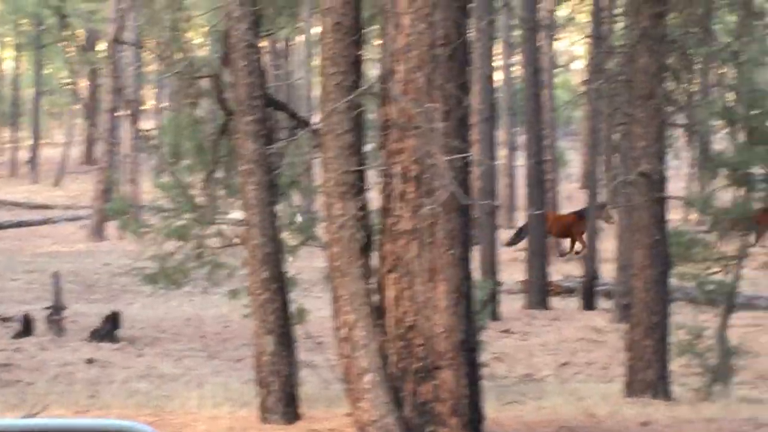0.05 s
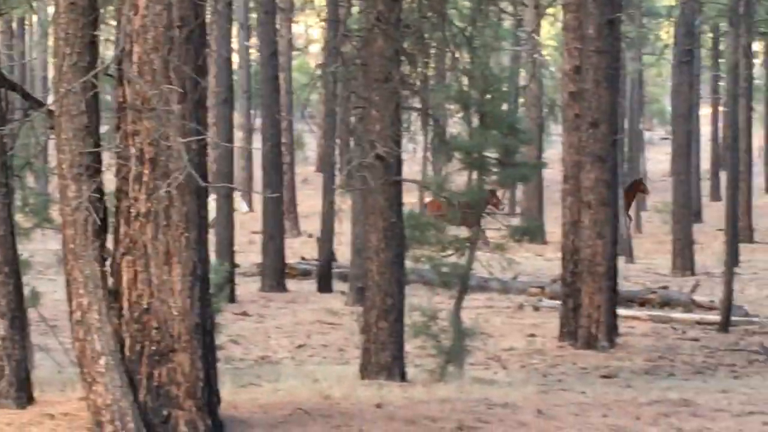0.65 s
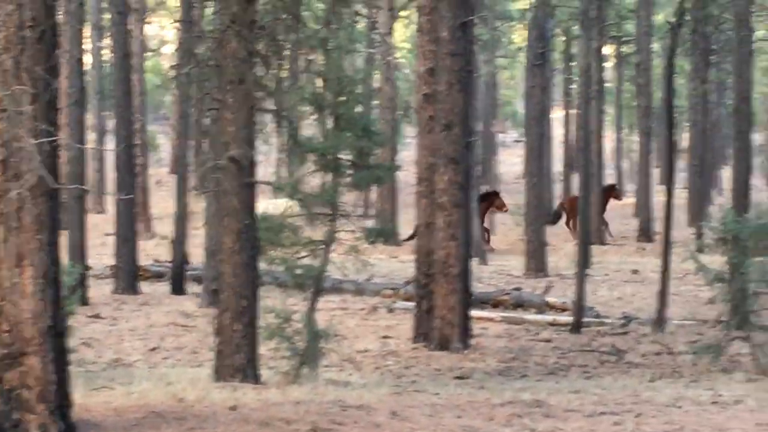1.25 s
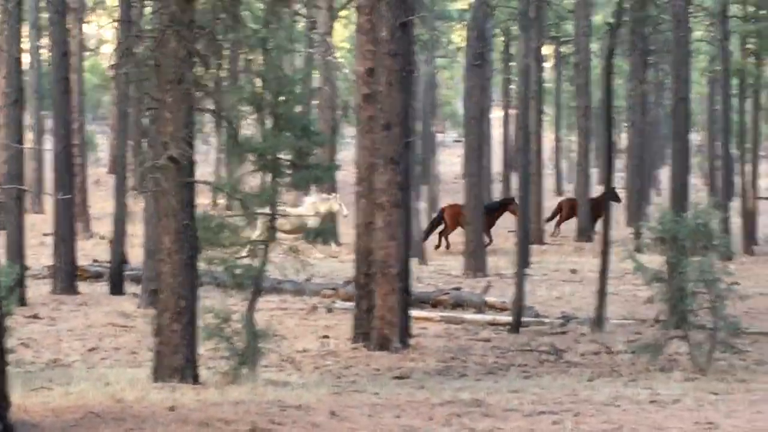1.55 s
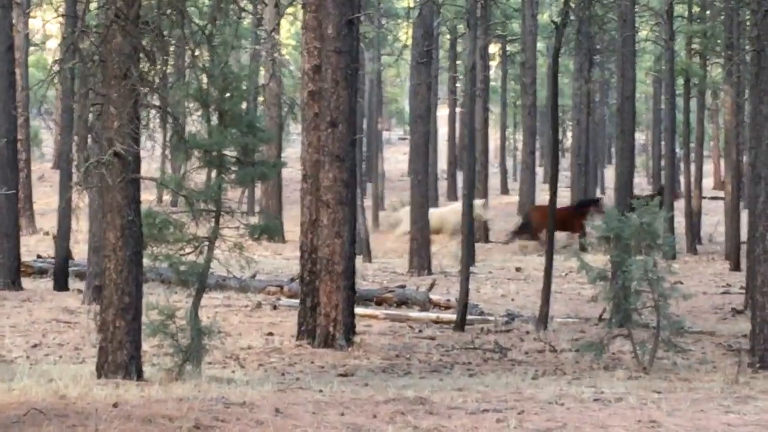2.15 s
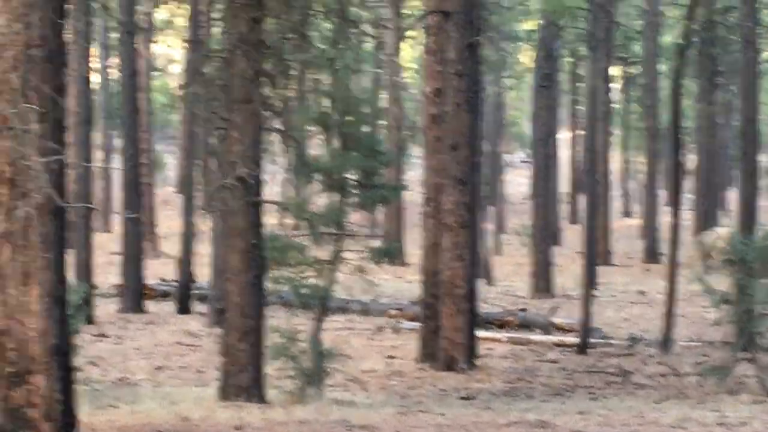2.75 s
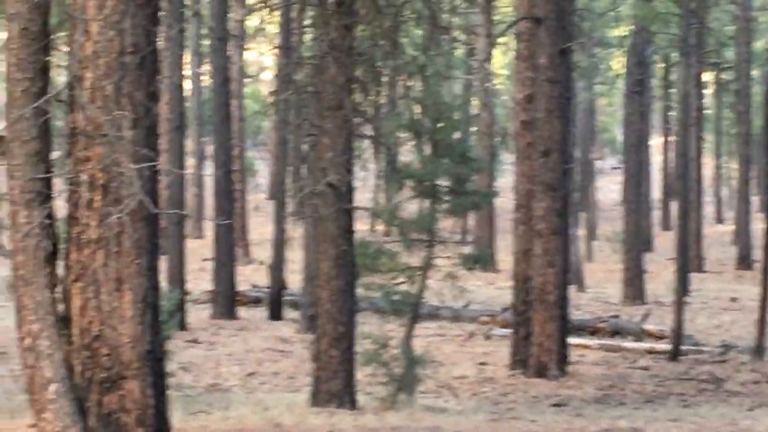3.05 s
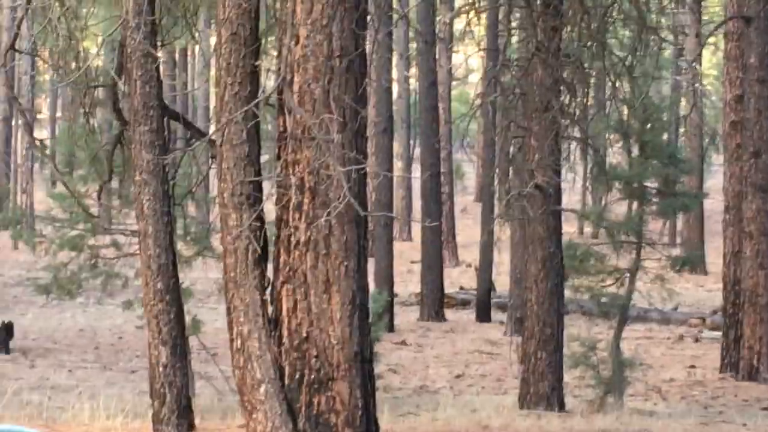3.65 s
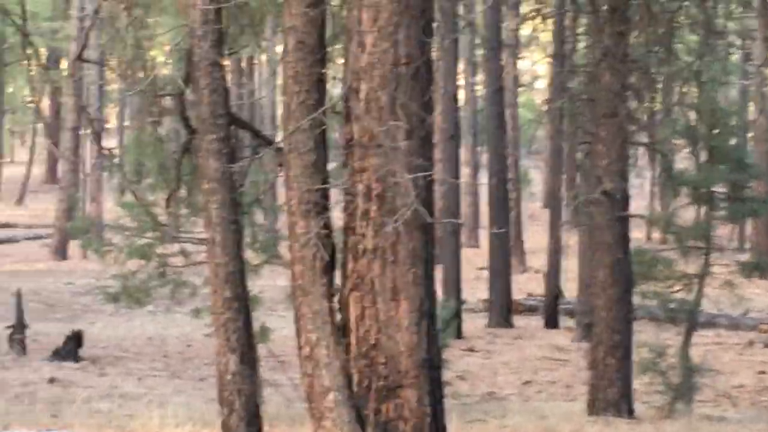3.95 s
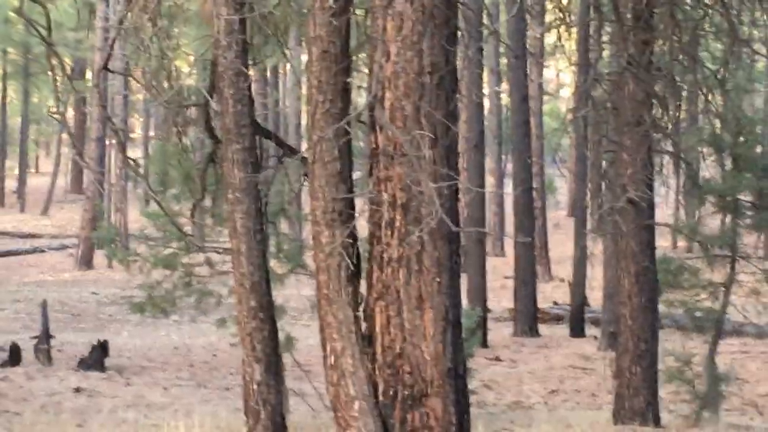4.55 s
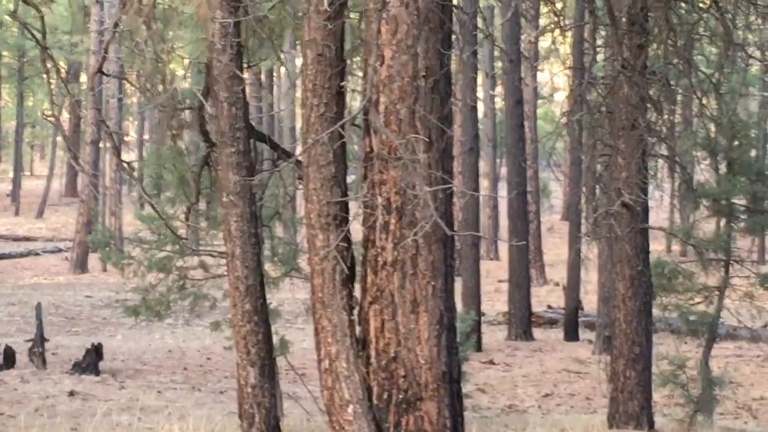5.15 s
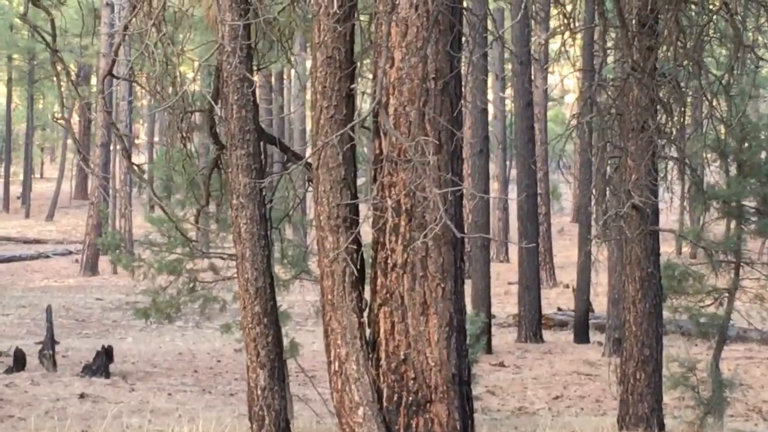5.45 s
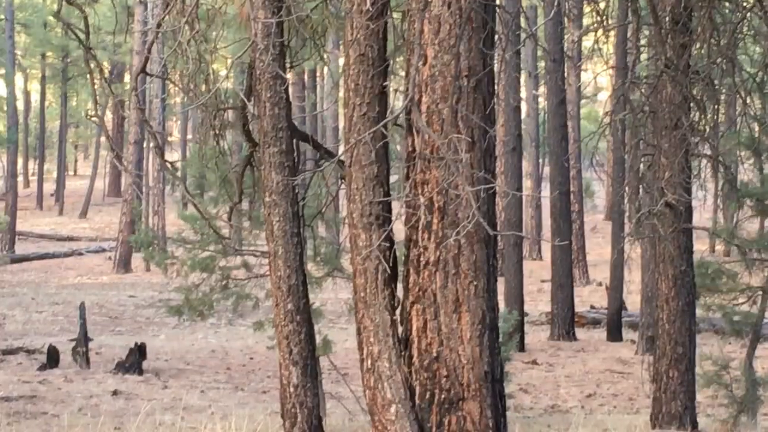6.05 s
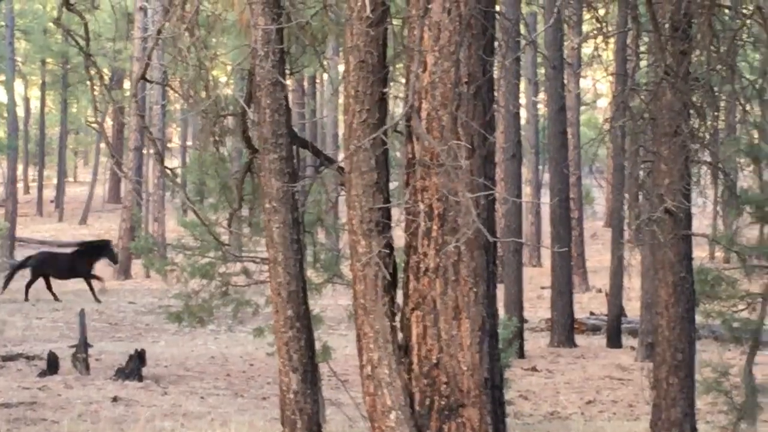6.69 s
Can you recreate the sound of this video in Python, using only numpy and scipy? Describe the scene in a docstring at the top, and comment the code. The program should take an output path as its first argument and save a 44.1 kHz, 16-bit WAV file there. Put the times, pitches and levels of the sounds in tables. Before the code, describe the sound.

Low, steady rumble of a nearby idling vehicle, with soft fan hiss and occasional faint clicks and knocks from a shifting hand.

```python
"""A six-cylinder vehicle idles close by. From the start, exhaust pulses throb at the firing rate, the
block shakes and rumbles, a slipping belt chirps in a pattern that repeats every engine cycle, and fan
air hisses over ringing panels; a sleeve rustles faintly by friction. From 0.6 s a hand shifts its grip
with small clicks, joined from 1.8 s by dull knuckle taps. The last tap and click fall near 6 s, and
the engine idles on."""
import sys
import numpy as np
from scipy import signal
from scipy.fft import rfft, irfft
from scipy.io import wavfile

SR = 44100
rng = np.random.default_rng(int(sys.argv[2]) if len(sys.argv) > 2 else 0)


def waveform_to_disk(signal):
    """Save audio, clipped to [-1, 1], as 16-bit WAV at the path in sys.argv[1]."""
    frames = np.transpose(np.atleast_2d(signal))
    scaled = np.clip(frames, -1, 1) * 32767
    samples = np.round(scaled).astype(np.int16)
    wavfile.write(sys.argv[1], SR, samples)


N = 300762

# engine speed, hunting about the idle: time_s, firing_rate_hz
FIRING_RATE = [(0, 34.21), (0.18, 34.05), (0.45, 34.68), (0.95, 34.68), (1.2, 34.41), (1.55, 34.61),
               (2.0, 34.11), (3.2, 33.86), (3.85, 33.56), (4.2, 33.89), (5.1, 33.97), (5.75, 34.54),
               (6.4, 34.21), (6.82, 34.58)]
# spectrum of the combustion rumble: frequency_hz, relative_density_db
RUMBLE_SPECTRUM = [(20, -40), (32, -7), (52, -1.5), (95, -3), (135, -9), (200, -7.5), (250, -12),
                   (400, -13), (490, -24.5), (700, -29), (1200, -50)]
# spectrum of the fan and intake air: frequency_hz, relative_density_db
AIR_SPECTRUM = [(300, -8.5), (600, 0.5), (900, 4.5), (1150, 0), (1500, -3), (2000, -3.5), (2300, -10),
                (3000, -13.5), (4000, -13.5), (4900, -21), (5700, -18), (7500, -23.5), (11000, -23.5),
                (15500, -33.5)]
# panel resonances of the engine bay: centre_hz, width_hz, level_db
BAY_MODES = [(614.4, 74, -68), (702, 24, -70.5), (739.6, 12, -70.5), (786.4, 8.7, -77), (835, 13, -81),
             (945, 52, -77.5), (1159, 36, -82), (1323, 8.3, -86), (1380, 10, -93.5), (1842, 72, -83.5),
             (1955, 36, -90), (2576, 160, -89)]
# spectrum of rubbing cloth: frequency_hz, relative_density_db
CLOTH_SPECTRUM = [(1500, 8), (3500, 1), (6500, -8), (9000, -7.5), (15000, -29)]
# arm movements that rub the sleeve: start_s, length_s, level_db
ARM_MOVES = [(0, 0.11, -87), (0.593, 2.1, -85), (3.35, .65, -85), (6.014, 0.074, -81)]
# contacts of the shifting grip: start_s, level_db, centre_hz, decay_s
GRIP_CLICKS = [(0.597, -61, 6500, 0.0021), (.963, -54.5, 3900, 0.0015), (0.973, -60.5, 2090, 0.0085),
               (0.995, -73, 3500, .012), (0.9978, -59, 7040, 0.0024), (1.176, -64.5, 3900, 0.0023),
               (1.269, -61.5, 8200, .0013), (1.573, -68, 4300, 0.0093), (1.672, -59.5, 4250, 0.0046),
               (2.003, -69.5, 3300, .006), (2.11, -70.5, 3400, 0.012), (2.426, -68, 3900, .003),
               (3.424, -59.5, 5100, 0.0019), (3.447, -70, 4500, .003), (3.914, -70, 3740, .009),
               (6.02, -71, 3250, .016)]
# knuckle blows: start_s, level_db, pitch_hz, decay_s, upper_mode_db
KNUCKLE_TAPS = [(1.763, -55, 1410, .007, -24), (2.11, -66, 1460, .008, -14), (3.581, -58, 1120, .007, -12),
                (4.760, -50.5, 1165, .0045, -11), (5.785, -64, 1180, .007, -4)]

CYLINDERS, IDLE_FIRING_HZ = 6, 34


def from_db(db):
    """Amplitude ratio of a level in decibels."""
    return 10 ** (np.asarray(db) / 20)


def unit_power(x):
    """Division by the RMS value gives a signal unit power."""
    return x / np.sqrt(np.mean(x ** 2) + 1e-20)


def noise(gain_at, size=N):
    """Spectral shaping: white noise weighted by a function of frequency, at unit power."""
    hz = np.maximum(np.fft.rfftfreq(size, 1 / SR), 1e-3)
    return unit_power(irfft(rfft(rng.standard_normal(size)) * gain_at(hz), size))


def coloured(spectrum):
    """Noise with a tabulated spectral envelope, falling 12 dB an octave below the first point."""
    freqs, levels = np.transpose(spectrum)
    envelope = lambda hz: from_db(np.interp(np.log(hz), np.log(freqs), levels))
    return noise(lambda hz: envelope(hz) * np.minimum(hz / freqs[0], 1) ** 2)


def resonant(centre_hz, width_hz):
    """Response of a steep-sided resonance to random excitation."""
    return noise(lambda hz: 1 / (1 + ((hz - centre_hz ** 2 / hz) / (1.55 * width_hz)) ** 2))


def drift(corner_hz, size=N):
    """Random fluctuation: low-pass noise of unit spread."""
    return noise(lambda hz: 1 / (1 + (hz / corner_hz) ** 4), size)


def firing_hz():
    """The firing rate, fundamental of the exhaust, at every sample."""
    return np.interp(np.arange(N) / SR, *np.transpose(FIRING_RATE))


def throb_level(idle_db=-41.5, labour_db_per_hz=4.5):
    """Exhaust level in dB under load: as the engine labours and slows, each stroke is heavier."""
    return idle_db + labour_db_per_hz * (IDLE_FIRING_HZ - firing_hz())


def exhaust(firings, second_harmonic_db=-19.5):
    """Periodic pressure, one swing a firing; a second harmonic rounds the crest and sharpens the trough."""
    angle = 2 * np.pi * firings
    swing = np.cos(angle) - from_db(second_harmonic_db) * np.cos(2 * angle)
    return from_db(throb_level()) * np.sqrt(2) * swing


def shake_level(order, level_db=-59.5, low_hz=43.3, high_hz=89.7, fall_db_per_octave=11):
    """Source and filter: the level in dB of a cycle harmonic is its drive through the body's pass band."""
    if order % CYLINDERS == 0:   # repeats every firing
        drive_db = 0
    elif order % 2 == 0:   # imbalance repeating every crank turn
        drive_db = -4.5
    elif order % (CYLINDERS // 2) == 0:   # every second firing
        drive_db = -3.5
    else:   # once a cycle
        drive_db = -12
    hz = order * IDLE_FIRING_HZ / CYLINDERS
    band_db = 40 * np.log10(min(hz / low_hz, 1)) - fall_db_per_octave * max(np.log2(hz / high_hz), 0)
    return level_db + drive_db + band_db


def block(firings, unsteady=0.31, rumble_db=-58, pulse_db=1.0, throb_coupling=0.098):
    """Forced vibration: unequal cylinders shake the body at cycle harmonics, over combustion rumble."""
    shake = np.zeros(N)
    drifts = [drift(2.3) for _ in range(CYLINDERS)]
    for order in range(4, 46):
        if order in (CYLINDERS, 2 * CYLINDERS):   # these two belong to the exhaust
            continue
        angle = 2 * np.pi * (order * firings / CYLINDERS + rng.random())
        swell, wobble = (unsteady * drifts[i] for i in rng.permutation(CYLINDERS)[:2])
        shake += from_db(shake_level(order)) * np.sqrt(2) * (1 + swell) * np.cos(angle + wobble)
    # the body shakes harder when the exhaust throbs harder
    throb_db = throb_level()
    shake *= from_db(throb_coupling * (throb_db - throb_db.mean()))
    rumble = coloured(RUMBLE_SPECTRUM) * from_db(rumble_db + pulse_db * np.cos(2 * np.pi * firings))
    return shake + rumble


def belt_slips(first_firings=5.22, spacing_firings=.815, pitch_hz=712, hard_db=-53, weak_db=-62):
    """Stick-slip: one hard slip a cycle, then five weak ones that regain strength with the tension."""
    for k in range(6):
        place = (first_firings + k * spacing_firings) % CYLINDERS
        yield place, pitch_hz, weak_db + 0.86 * (k - 1) if k else hard_db
        # the slack side answers later and lower: place_firings, pitch_hz, level_db
        yield place + 0.29, 610.5, -66.5


def belt(firings, sag_hz=35, scatter_hz=8, uneven_db=1.0, waver_hz=7):
    """Friction-excited vibration: tugs of the crank make the belt slip in short, falling chirps."""
    out, waver = np.zeros(N), waver_hz * drift(60)
    for place, pitch_hz, level_db in belt_slips():
        cycles = (firings - place) / CYLINDERS + .5
        chirp_index = np.floor(cycles).astype(int) + 1
        past_peak = (cycles % 1 - .5) * CYLINDERS   # in firings
        strength, detune, phase = rng.standard_normal((chirp_index.max() + 1, 3))[chirp_index].T
        # the pitch sags ever faster until the belt grips again and the chirp stops short
        sag = sag_hz * (1 - np.exp(2 * np.minimum(past_peak, .5)))
        hz = pitch_hz + sag + scatter_hz * detune + waver
        width_firings = np.where(past_peak < 0, .35, .168)
        swell = np.exp(-.5 * (past_peak / width_firings) ** 2)
        tone = np.sqrt(2) * np.sin(2 * np.pi * (np.cumsum(hz) / SR + phase))
        out += from_db(level_db + uneven_db * strength) * swell * tone
    return out


def engine_bay(firings, air_db=-70.0, air_pulse_db=0.62, ring_pulse_db=-1.5):
    """Amplitude modulation: fan air and ringing panels pulse each firing, the air each crank turn too."""
    ringing = sum(from_db(level_db) * resonant(hz, width_hz) for hz, width_hz, level_db in BAY_MODES)
    turn_pulse = np.cos(2 * np.pi * (2 * firings / CYLINDERS - .75))
    firing_pulse = np.cos(2 * np.pi * (firings - .35))
    air = coloured(AIR_SPECTRUM) * from_db(air_db + air_pulse_db * (turn_pulse + firing_pulse))
    return air + ringing * from_db(ring_pulse_db * np.cos(2 * np.pi * (firings - .4)))


def sleeve(rest_db=-92, attack_s=0.025, release_s=0.21, clump_db=3.5):
    """Friction noise: cloth rubs in uneven clumps that swell and fade with each movement of the arm."""
    t, rub = np.arange(N) / SR, from_db(rest_db)
    for start_s, length_s, level_db in ARM_MOVES:
        rise = np.clip((t - start_s) / attack_s, 0, 1)
        fall = np.exp(-np.maximum(t - start_s - length_s, 0) / release_s)
        rub = rub + from_db(level_db) * rise * fall
    return rub * unit_power(coloured(CLOTH_SPECTRUM) * from_db(clump_db * drift(56)))


def grip_clicks(spread_octaves=0.97, case_hz=5900, case_width_hz=540, tail_db=-21, tail_s=0.083):
    """Impact noise: each contact is a brief gritty burst that rings the case, with a faint cabin tail."""
    out, t = np.zeros(N + SR), np.arange(SR // 4) / SR
    case = lambda hz: 1 + from_db(-8) / (1 + (2 * (hz - case_hz) / case_width_hz) ** 2)
    attack = 1 - np.exp(-t / .0006)
    for start_s, level_db, centre_hz, decay_s in GRIP_CLICKS:
        band = lambda hz: 1 / (1 + (np.log2(hz / centre_hz) / spread_octaves) ** 4)
        burst = noise(lambda hz: case(hz) * band(hz) * np.minimum(centre_hz / hz, 1) ** .5, len(t))
        grit = from_db(2 * drift(500, len(t)))
        fade = grit * np.exp(-t / decay_s) + from_db(tail_db) * np.exp(-t / tail_s)
        at = round(start_s * SR)
        out[at:at + len(t)] += from_db(level_db) * burst * attack * fade
    return out[:N]


def knuckle_taps(upper_ratio=1.93, thud_db=-14, thud_s=0.023):
    """Damped free vibration: a soft blow rings two modes over a short noisy thud."""
    out, t = np.zeros(N + SR), np.arange(SR // 4) / SR
    for start_s, level_db, pitch_hz, decay_s, upper_mode_db in KNUCKLE_TAPS:
        angle = 2 * np.pi * pitch_hz * t
        modes = np.sin(angle) + from_db(upper_mode_db) * np.sin(upper_ratio * angle)
        thud = noise(lambda hz: 1 / (1 + np.log2(hz / pitch_hz) ** 4), len(t))
        tap = modes * np.exp(-t / decay_s) + from_db(thud_db) * thud * np.exp(-t / thud_s)
        at = round(start_s * SR)
        out[at:at + len(t)] += from_db(level_db) * tap
    return out[:N]


def scene():
    """Superposition: the engine's sounds, all timed by the crank, add to those of the arm and hand."""
    firings = .27 + np.cumsum(firing_hz()) / SR   # crank angle, counted in firings
    engine = exhaust(firings) + block(firings) + belt(firings) + engine_bay(firings)
    return (engine + grip_clicks() + knuckle_taps() + sleeve())[None]


def record(dry, port_hz=10500, port_width_hz=600, port_depth=0.52, cutoff_hz=15700):
    """Antiresonance of the microphone port notches the treble; a steep low-pass filter cuts the top."""
    notched = signal.lfilter(*signal.iirnotch(port_hz, port_hz / port_width_hz, fs=SR), dry)
    heard = dry + port_depth * (notched - dry)
    return signal.sosfilt(signal.ellip(12, .1, 80, cutoff_hz, fs=SR, output="sos"), heard)


dry = scene()
out = record(dry)
waveform_to_disk(out)
```